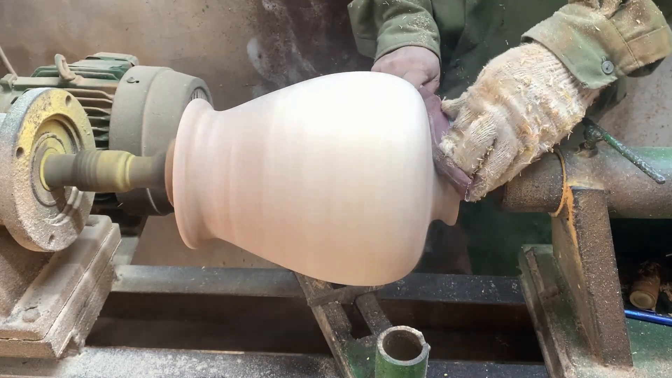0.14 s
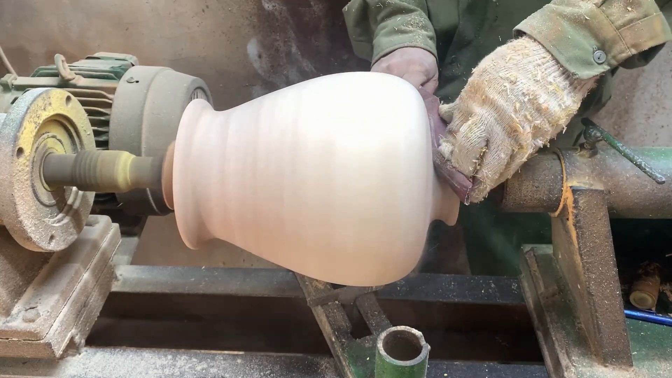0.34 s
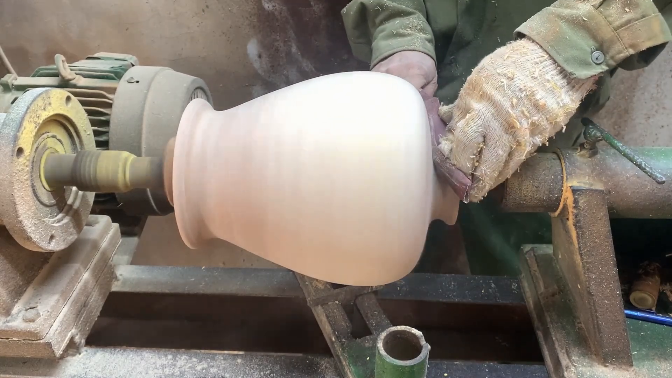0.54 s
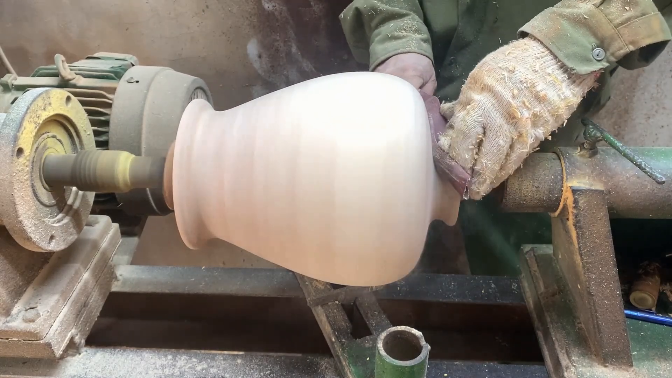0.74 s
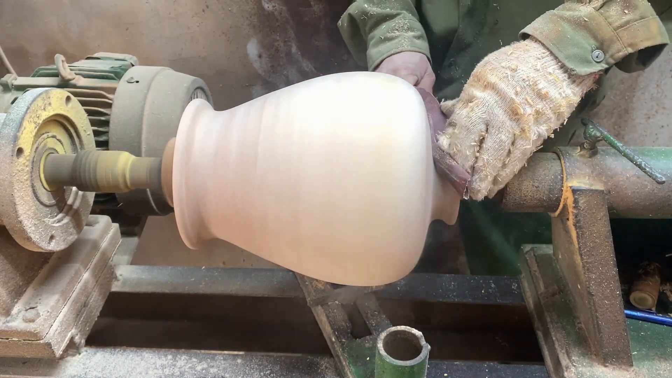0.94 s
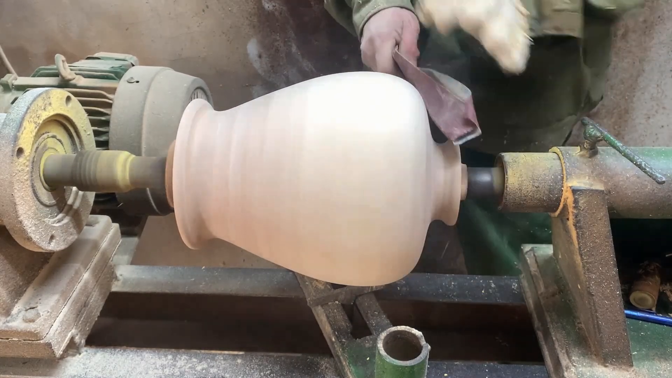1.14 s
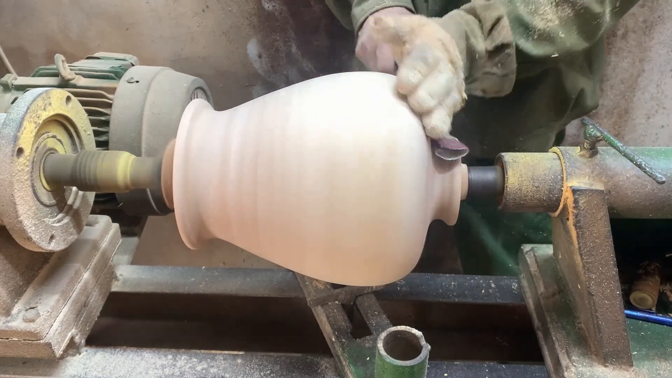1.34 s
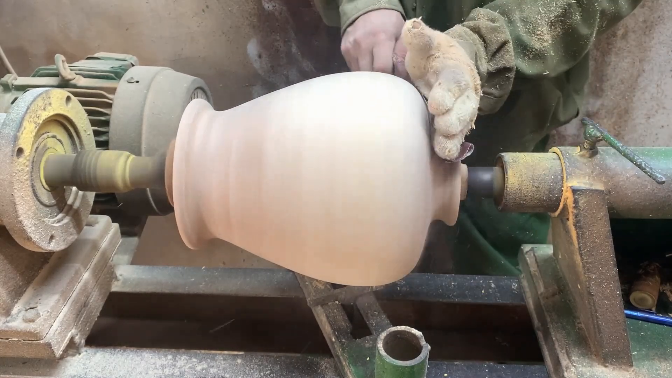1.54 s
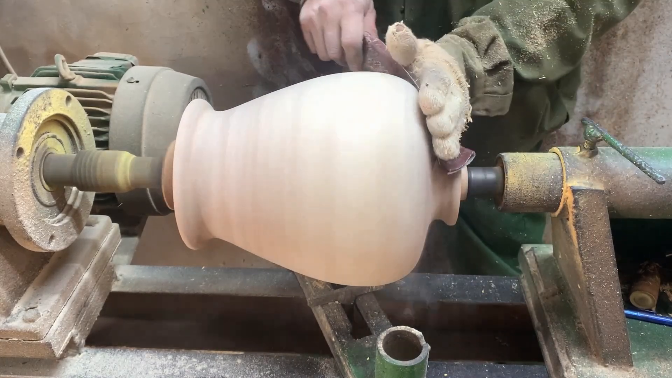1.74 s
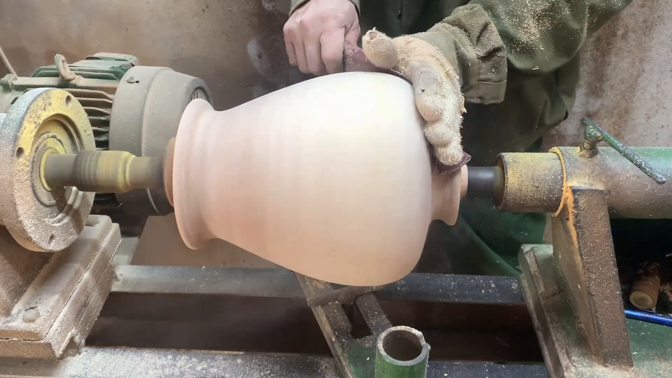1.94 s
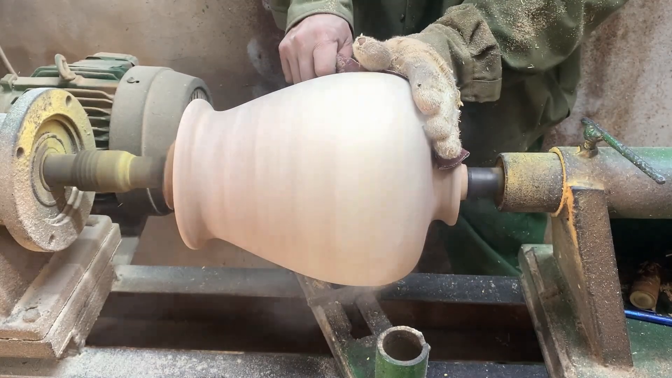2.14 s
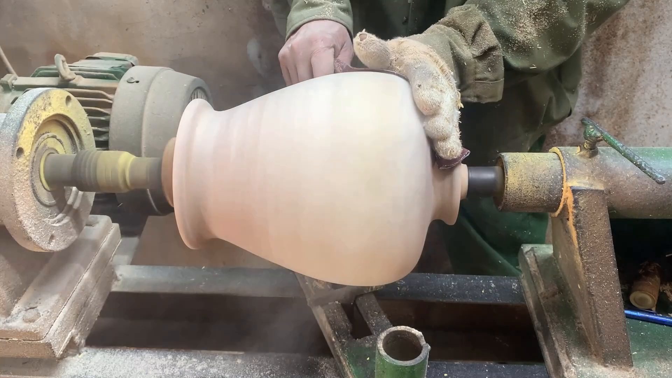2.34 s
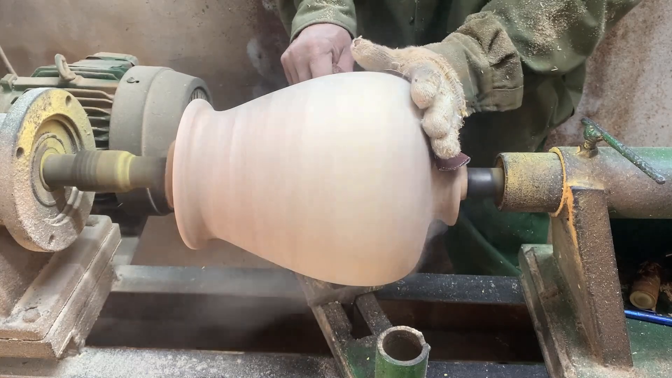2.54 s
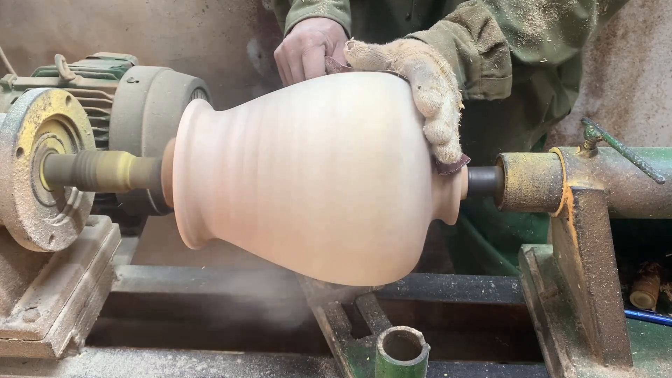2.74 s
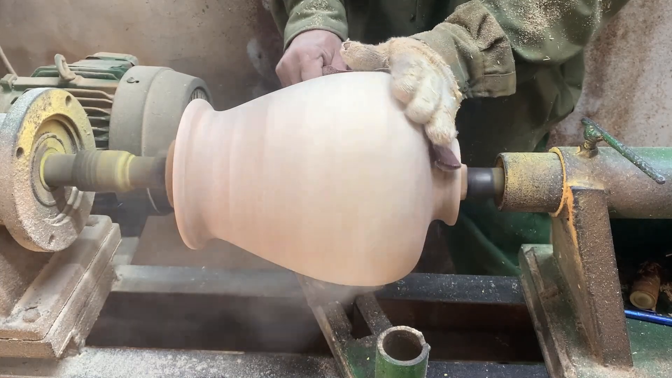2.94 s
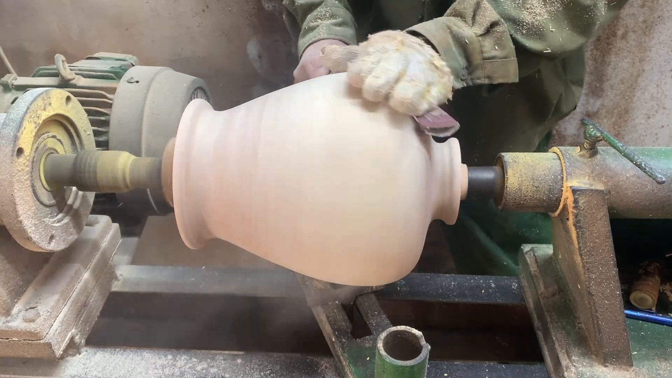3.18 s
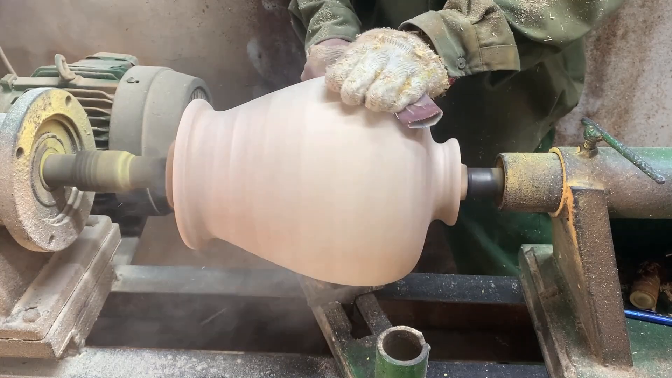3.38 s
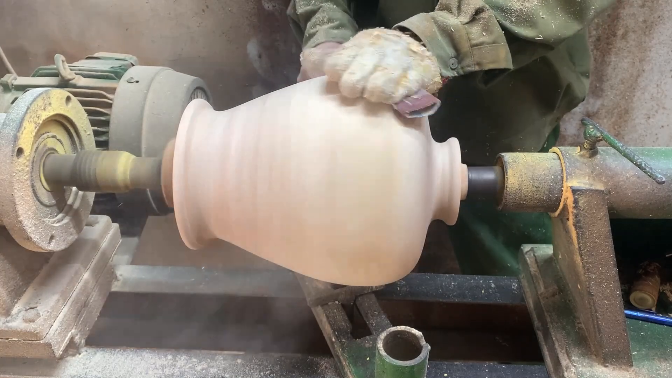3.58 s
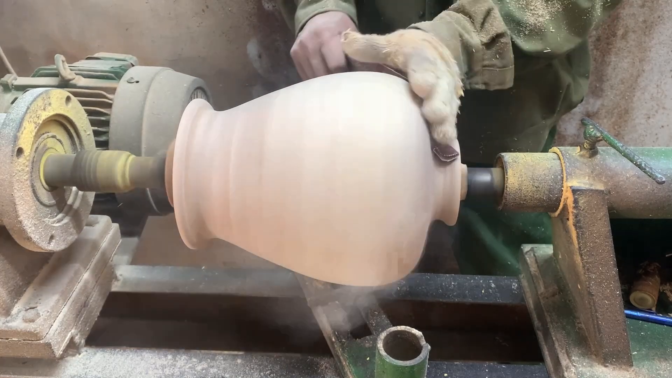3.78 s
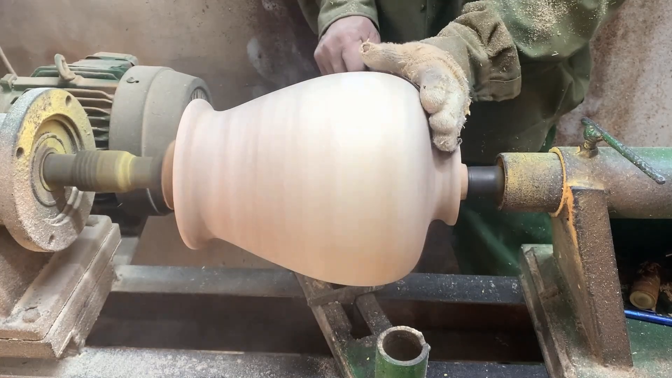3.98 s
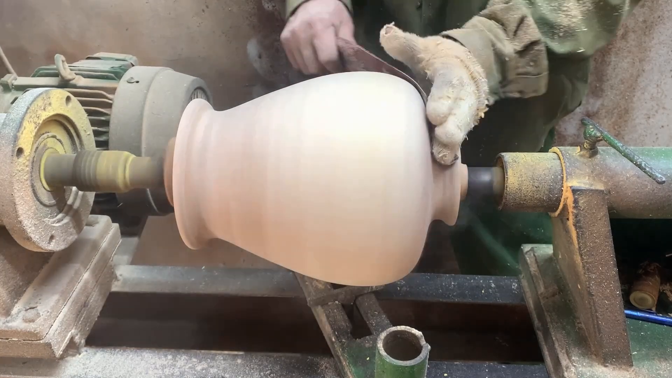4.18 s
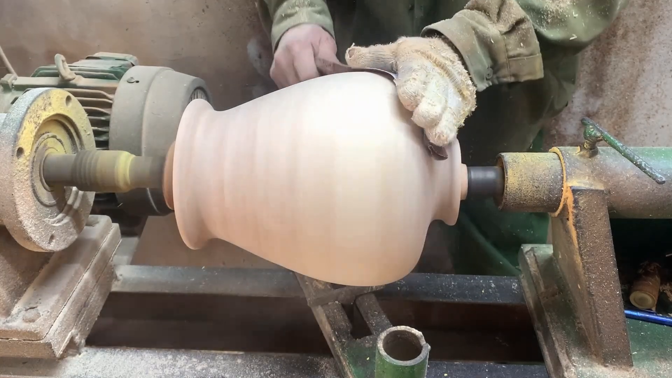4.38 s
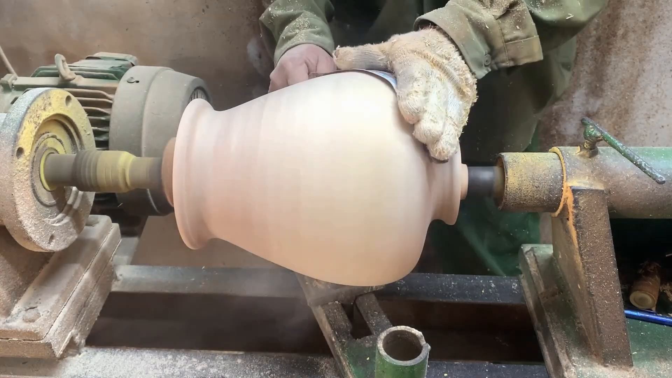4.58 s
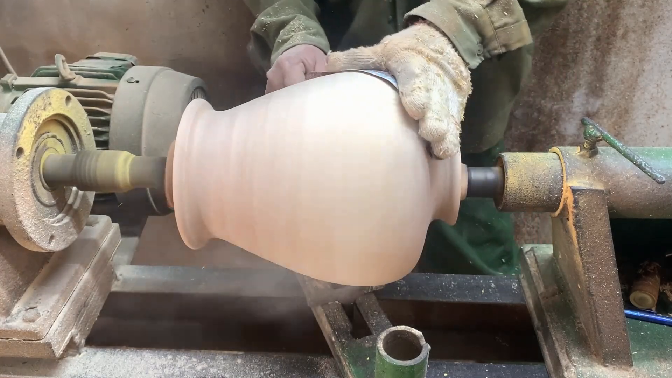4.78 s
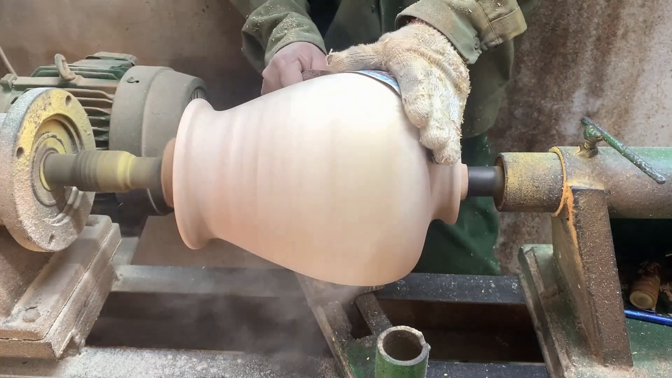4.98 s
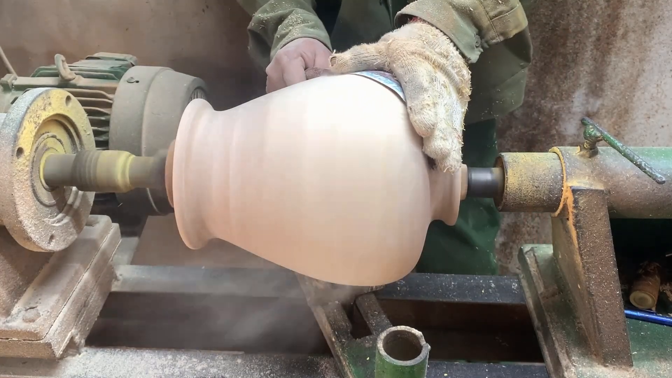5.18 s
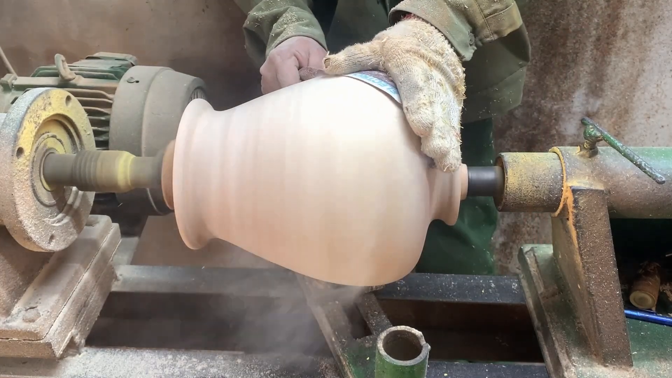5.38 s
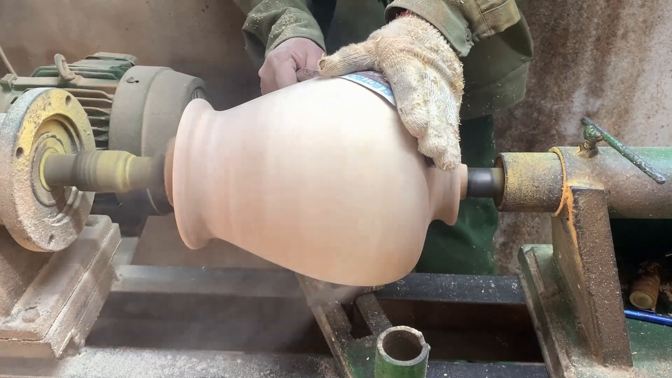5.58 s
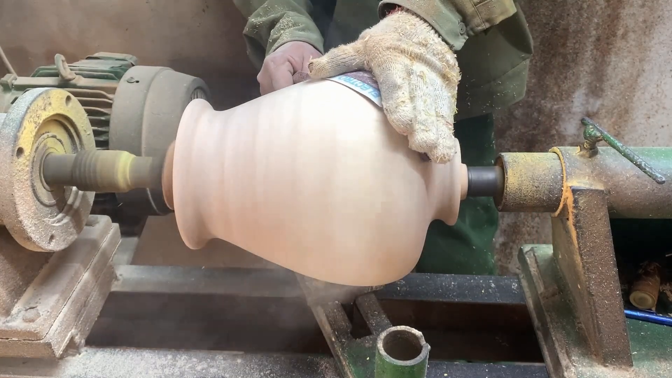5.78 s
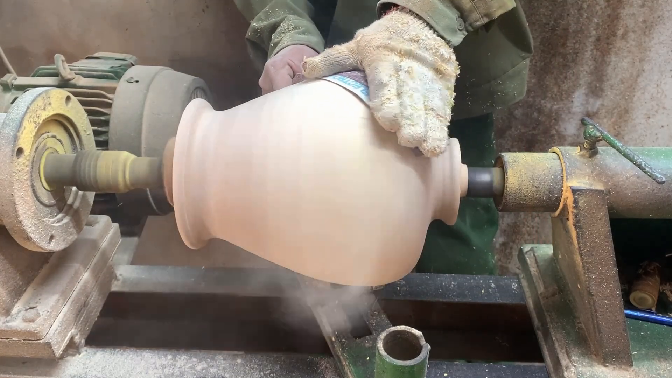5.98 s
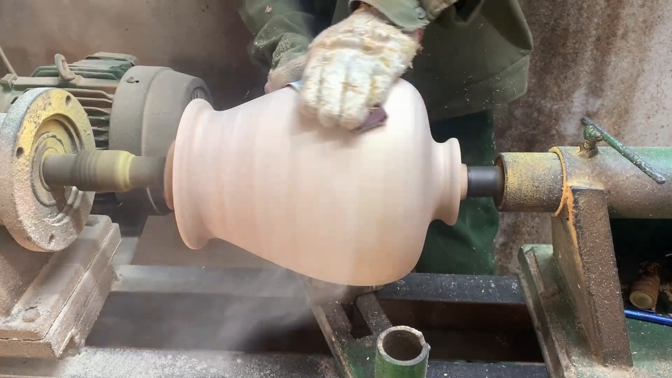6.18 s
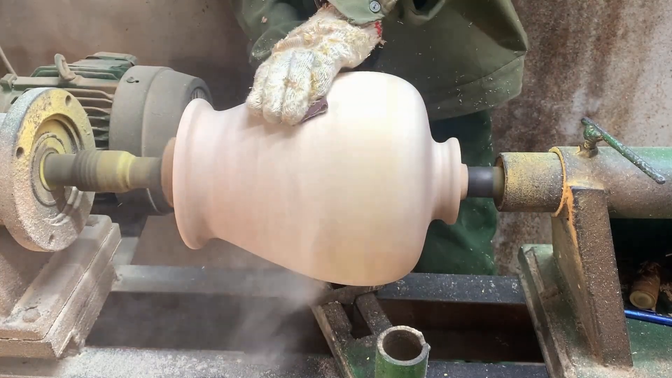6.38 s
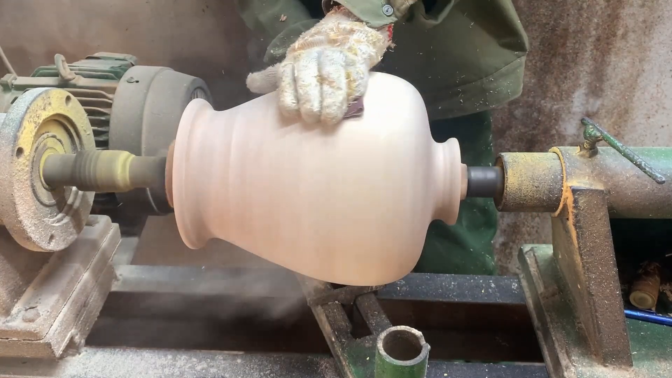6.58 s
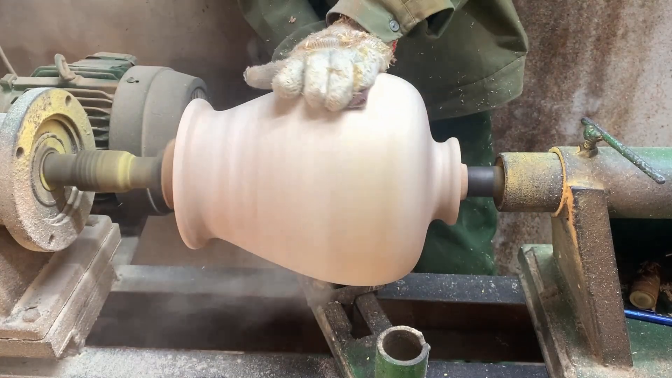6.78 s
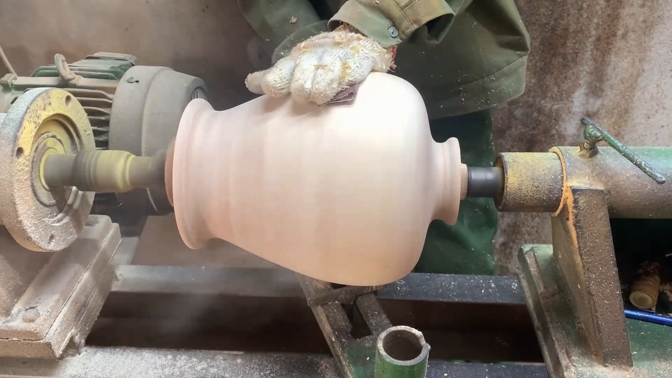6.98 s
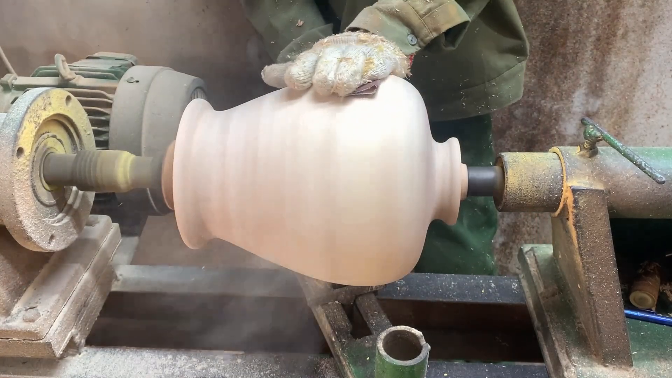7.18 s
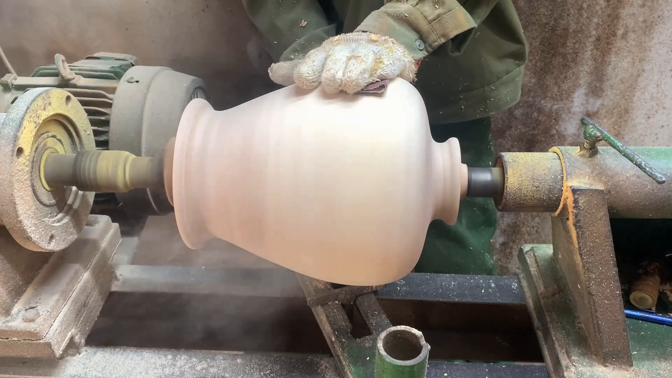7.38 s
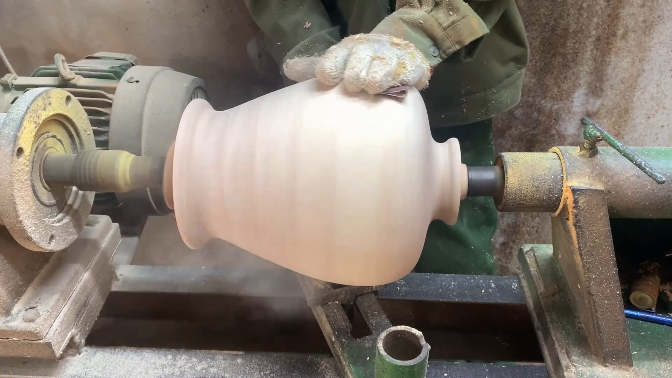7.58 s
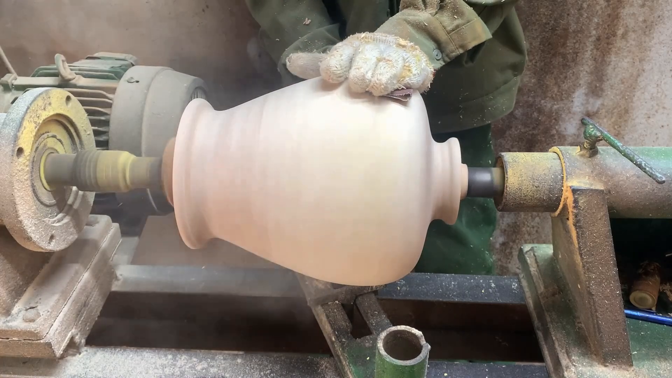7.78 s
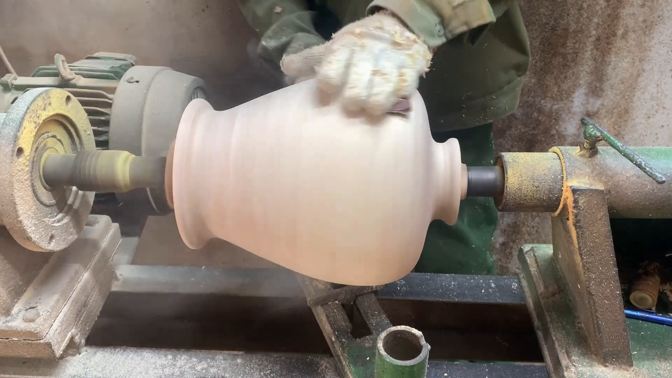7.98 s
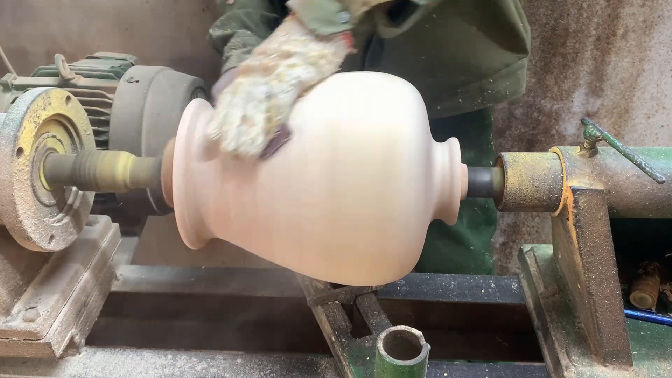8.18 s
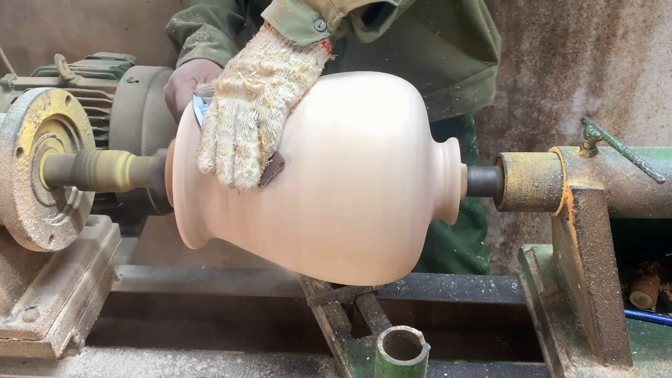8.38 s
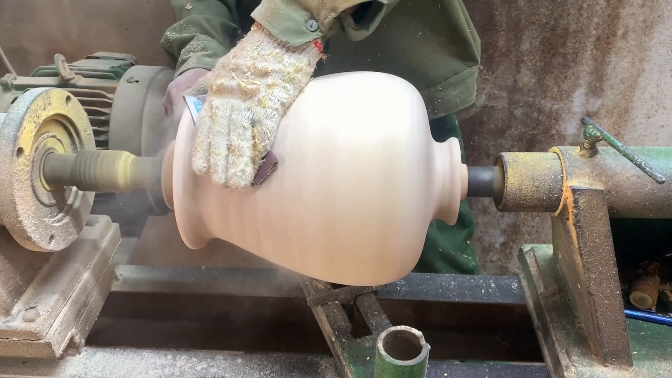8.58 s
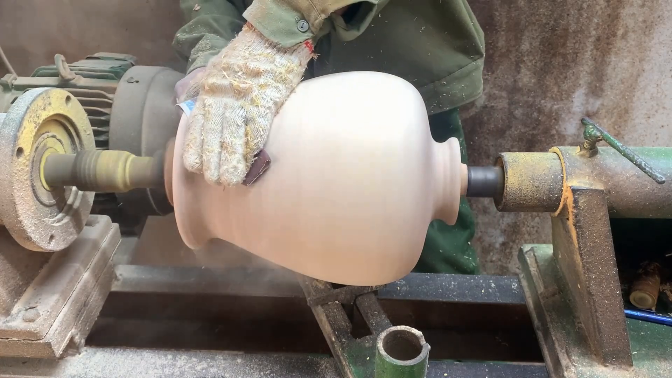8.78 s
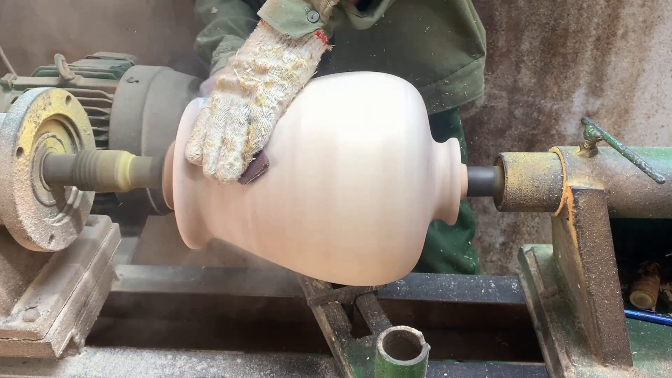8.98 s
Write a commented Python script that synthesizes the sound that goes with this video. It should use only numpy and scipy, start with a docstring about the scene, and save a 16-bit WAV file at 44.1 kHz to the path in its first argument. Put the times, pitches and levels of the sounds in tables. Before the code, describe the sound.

Sandpaper pressed against a wooden vase on a running lathe makes a bright, grainy hiss and rasp. It breaks off for an instant early on, returns louder, then swells and eases, with a few tiny scratches midway. Near the end the rubbing turns raspier, with a thin ringing edge. Underneath, the lathe drones, throbs and hums throughout, heard close up in a workshop.

```python
"""Sanding a vase on a lathe

Sandpaper is pressed by hand on a spinning wooden vase. Countless grains strike the wood and
make a hiss and a rasp that swell with each turn while the paper flutters. The paper starts
wedged in the foot of the vase, lifts off once, and ends in the neck. Underneath, belt and
bearings make the iron parts of the lathe drone and throb, the stand rumbles and the drive hums."""
import sys
import numpy as np
from scipy import signal
from scipy.fft import rfft, irfft, next_fast_len
from scipy.io import wavfile
from scipy.ndimage import uniform_filter1d

SR = 44100
rng = np.random.default_rng(int(sys.argv[2]) if len(sys.argv) > 2 else 0)


def dump(signal):
    """Clip the signal to [-1, 1] and save it as 16-bit WAV at the path in sys.argv[1]."""
    limited = np.clip(np.atleast_2d(signal).T, -1, 1)
    pcm = np.round(limited * 32767).astype(np.int16)
    wavfile.write(sys.argv[1], SR, pcm)


N = 398223

# Levels in the tables are relative. "Side" means left minus right.
# How loud the lathe runs: t/s, level/dB
LATHE_LEVELS = [(0, -39), (1.9, -37.5), (2.15, -35.5), (2.38, -41.5), (4.05, -41.5), (4.65, -43),
                (5.1, -46), (6.5, -47), (7.8, -40.5), (8.15, -44), (9.03, -43.0)]
# Moments when the lathe shudders: t/s, bed surge/dB, headstock surge/dB, stand surge/dB
SHUDDERS = [(.07, 2.5, 4, 2), (.5, 3.5, 0, 10), (1.11, -0.5, 7, 0), (1.3, 2.5, 0, 6), (1.67, 1.5, -2, 8),
            (2.83, -1, 0, 5), (3.22, 2, -8, -1), (3.98, -2.5, 5, 6), (5.08, -2, 0, 8), (7.32, 0.5, -2.5, 5)]
# Tone colour of the stand's rumble and of the whirr of motor and belt: f/Hz, level/dB
RUMBLE_SPECTRUM = [(8, -18), (30, -5), (60, -6.5), (73, -5), (82, -2.5), (97, 3.5), (130, -8.5), (220, -41),
                   (600, -50)]
WHIRR_SPECTRUM = [(60, -11), (140, -4), (220, 1.5), (700, 0.5), (1400, -3), (2400, -7), (4000, -13),
                  (15000, -37)]
# Where the whirr and the paper are heard: f/Hz, side/dB
WHIRR_SIDE = [(200, -2.5), (800, -2.5), (4000, -4)]
PAPER_SIDE = [(1000, -4.5), (2400, -1), (5000, -5), (7700, -2), (8400, 3.5), (10000, 4.5), (15000, 5.5)]
# Ringing of the bed (the base), the headstock (which holds the shaft) and the motor case:
# f/Hz, width/Hz, level/dB, side/dB
BED_MODES = [(253, 89, -12, -5), (403.5, 52, -1, 1), (457.6, 58, 0.5, 0.5), (506, 51, -8, -12),
             (614, 58, -10, -10)]
HEADSTOCK_MODES = [(810.7, 57.4, 0, 0.5)]
MOTOR_MODES = [(1060, 88, 2, 1.8), (1215, 66, 3, 2.8), (1620, 320, -9.5, 0.28)]
# Rhythms of belt, shafts and bearing balls that load each part: f/Hz, depth/dB, first crest t/s
BED_THROBS = [(2.78, 2.1, .022), (35.66, 1.6, .021), (86.85, 1.7, .004)]
HEADSTOCK_THROBS = [(4.85, 2.3, .045), (10.85, 1.4, .016), (17.83, 1.8, .043), (35.7, 1.2, .021)]
MOTOR_THROBS = [(2.62, .9, .22), (37.4, 2.0, .007)]
# Scratches as the hand shifts the sheet: middle t/s, length/s, f/Hz, width/Hz, level/dB
SCRATCHES = [(3.843, .05, 5200, 900, -42), (3.992, .07, 4700, 350, -38), (4.036, .04, 4100, 200, -43),
             (6.09, .09, 4600, 700, -54)]
# How loud the paper rubs on the wood: t/s, hiss level/dB, rasp level/dB
PAPER_LEVELS = [(0, -37.5, -38.5), (0.45, -33.5, -40.0), (1.15, -38.5, -40), (1.42, -35.5, -40),
                (1.46, -31.5, -40.5), (1.7, -36, -40), (1.93, -29.0, -37.0), (2.38, -29.5, -39),
                (2.55, -26.0, -41), (2.8, -31.0, -39.5), (3.55, -33.5, -46.5), (3.83, -31.5, -43),
                (3.96, -37, -43), (4.38, -37.0, -43.5), (4.47, -29.5, -43.5), (4.72, -27, -41),
                (4.82, -29.5, -44), (5.98, -32, -43), (6.15, -33.5, -45.5), (6.55, -37.0, -46.5),
                (6.87, -35.5, -47.5), (7.04, -40.5, -49), (7.35, -34.5, -45.5), (8.1, -35, -47.0),
                (8.35, -33.5, -38.5), (8.85, -32, -40.5), (9.03, -36.5, -41.5)]
# Tone colours of the rubbing, from high to low: f/Hz, level/dB
HISS_SPECTRUM = [(2000, -21.5), (5000, -13), (7000, -5), (8200, -3), (9500, -2), (12000, -1), (13500, -3.5),
                 (15700, -8.5)]
RASP_SPECTRUM = [(1200, -19.5), (2600, -12), (3600, -4.5), (5000, -1.5), (6300, -0.5), (7600, 0),
                 (9500, -5.5), (15000, -37)]
SCRAPE_SPECTRUM = [(300, -17), (1000, -11), (1700, -4.5), (2400, -1), (3200, 0), (4500, -8), (8000, -38)]
# Ringing of the folded sheet and of its edge: f/Hz, width/Hz, level/dB, side/dB
SHEET_MODES = [(2380, 100, 5.5, 0), (3700, 74, -0.5, 7.5), (6000, 490, -0.5, -19)]
EDGE_MODES = [(4200, 880, -9.5, 0), (6200, 1100, -6.5, 0), (8300, 560, -3.5, 0)]

TURN_HZ, HUM_HZ = 17.85, 89.2
LIFT_S, LAND_S = 1.251, 1.344  # the paper leaves the wood and touches it again
TIME = np.arange(N) / SR


def amp(db):
    """Turns decibels into a gain to multiply by."""
    return 10 ** (np.asarray(db) / 20)


def unit(x):
    """Scales a signal to an average strength (rms) of 1."""
    return x / np.sqrt(np.mean(x ** 2) + 1e-20)


def pan(side_db):
    """Left and right gains that set a sound to one side."""
    return amp(np.array([[.5], [-.5]]) * side_db)


def ramp(start_s, length_s):
    """Rises from 0 to 1 in a straight line."""
    return np.clip((TIME - start_s) / length_s, 0, 1)


def db_at(table, hz):
    """Looks up decibels by frequency, gliding between rows on a pitch-like scale."""
    f, db = np.transpose(table)
    return np.interp(np.log(hz + 1), np.log(f + 1), db)


def follow(table):
    """Joins the rows of a time table with straight lines, one curve per column."""
    times, *columns = np.transpose(table)
    return [np.interp(TIME, times, column) for column in columns]


def shaped(x, gain):
    """Filters x by a gain that depends on frequency."""
    size = next_fast_len(N + 4096, True)
    return irfft(rfft(x, size) * gain(np.fft.rfftfreq(size, 1 / SR)), size)[..., :N]


def noise(gain):
    """Stereo noise of strength 1, coloured by a gain that depends on frequency."""
    return unit(shaped(rng.standard_normal((2, N)), gain))


def wander(hz, width_hz):
    """A random wobble of strength 1, with rates around hz."""
    step = 20
    at = np.arange(0, N, step)
    band = np.exp(-.5 * ((np.fft.rfftfreq(len(at), step / SR) - hz) / width_hz) ** 2)
    wobble = irfft(rfft(rng.standard_normal(len(at))) * band, len(at))
    return unit(np.interp(np.arange(N), at, wobble))


def cycle(hz, drift_rad):
    """A smooth wave that slowly drifts ahead of and behind its beat."""
    return np.cos(2 * np.pi * (hz * TIME + rng.random()) + drift_rad * wander(0, 1))


def resonances(modes, f):
    """Left and right gains of a ringing body: its peaks add in power."""
    peaks = [amp(db) * pan(side_db) / (1 + ((f - hz) / (0.8 * width)) ** 2)
             for hz, width, db, side_db in modes]
    return np.sqrt(np.sum(np.square(peaks), axis=0))


def grit(snaps_per_s, spread_db, snap_gain):
    """Countless tiny impacts merge into noise; single coarse grains snap out of it."""
    size = amp(spread_db * np.minimum(rng.exponential(1, (2, N)), 4))
    snaps = size * rng.choice([-1, 1], (2, N)) * (rng.random((2, N)) < snaps_per_s / SR)
    return unit(rng.standard_normal((2, N)) + snap_gain * unit(snaps))


def tilted(x, db_per_octave, pivot_hz):
    """Makes a sound brighter or duller over time by tipping its spectrum like a seesaw."""
    hz, t, spectra = signal.stft(x, SR, nperseg=512)
    octaves = np.clip(np.log2((hz + 1) / pivot_hz), -1, 1)[:, None]
    slope = np.interp(t, TIME, db_per_octave)
    return signal.istft(spectra * amp(octaves * slope), SR, nperseg=512)[1][:, :N]


def shudders(spread_s=.07):
    """Brief bell-shaped surges of bed, headstock and stand, in dB."""
    times, *surges_db = np.transpose(SHUDDERS)
    distance = (TIME - times[:, None]) / spread_s
    return np.array(surges_db) @ np.exp(-np.minimum(distance ** 2, 20))


def stand(level_db, surge_db):
    """The stand rumbles in lumps as hard as the lathe runs, with the wavering hum of the drive."""
    rumble = noise(lambda f: amp(db_at(RUMBLE_SPECTRUM, f)))
    hum = cycle(HUM_HZ, drift_rad=0.73) * amp(2.2 * wander(0, 2.9))
    lumps_db = 2.0 * wander(0, 9)
    shake_db = level_db + 0.18 * (level_db.mean() - level_db)
    return amp(shake_db + surge_db + lumps_db) * pan(-4.5) * (amp(-18) * rumble + amp(-26) * hum)


def drone(modes, throbs, uneven_db):
    """Rolling bearings make one part of the lathe ring, throbbing with the load on it."""
    load_db = sum(db * np.cos(2 * np.pi * hz * (TIME - crest)) for hz, db, crest in throbs)
    rolling = grit(snaps_per_s=300, spread_db=4.0, snap_gain=0.34)
    rolling *= amp(load_db + uneven_db * wander(0, 24))
    return unit(shaped(rolling, lambda f: resonances(modes, f)))


def lathe(level_db, bed_db, headstock_db):
    """Bed, headstock and motor case each drone in their own rhythm over the belt's steadier whirr."""
    bed = amp(-0.7 + bed_db) * drone(BED_MODES, BED_THROBS, uneven_db=2.23)
    headstock = amp(-2 + headstock_db) * drone(HEADSTOCK_MODES, HEADSTOCK_THROBS, uneven_db=1.5)
    motor = amp(-3.5) * drone(MOTOR_MODES, MOTOR_THROBS, uneven_db=2.5)
    whirr = amp(-2) * noise(lambda f: amp(db_at(WHIRR_SPECTRUM, f)) * pan(db_at(WHIRR_SIDE, f)))
    whirr_db = level_db + 0.67 * (level_db.mean() - level_db)
    return amp(level_db) * (bed + headstock + motor) + amp(whirr_db) * whirr


def scratches():
    """An edge of the sheet catches for a moment and rings around one pitch."""
    out = np.zeros((2, N))
    for middle_s, length_s, hz, width_hz, db in SCRATCHES:
        count = round(length_s * SR)
        start = round((middle_s - length_s / 2) * SR)
        peak = signal.iirpeak(hz, hz / width_hz, fs=SR)
        edge = signal.lfilter(*peak, rng.standard_normal((2, count)))
        out[:, start:start + count] += amp(db) * unit(edge) * np.hanning(count)
    return out


def pressure():
    """Pressure swings with each turn, the fluttering sheet and the hand; gives a gain."""
    turn_db = 0.4 * cycle(TURN_HZ, drift_rad=0.84)
    flutter_db = 0.52 * wander(64, width_hz=8)
    tremor_db = 0.37 * wander(0, width_hz=26)
    sway_db = 0.38 * wander(7, width_hz=3)
    chatter_db = 0.38 * wander(0, width_hz=160)
    return amp(turn_db + flutter_db + tremor_db + sway_db + chatter_db)


def patchy_flicker(x, flicker_db):
    """The tone colour flickers at random in small patches of pitch and time."""
    spectra = signal.stft(x, SR, nperseg=1024)[2]
    patches = rng.standard_normal(spectra.shape[1:])
    patches = uniform_filter1d(patches, size=4, axis=0)  # blur across frequency
    patches = unit(uniform_filter1d(patches, size=5, axis=1))  # blur across time
    return signal.istft(spectra * amp(flicker_db * patches), SR, nperseg=1024)[1][:, :N]


def lifted(fade_s):
    """1 while the paper is held clear of the wood, 0 while it touches."""
    return ramp(LIFT_S - fade_s, fade_s) - ramp(LAND_S, fade_s)


def rub(spectrum):
    """Grains striking the wood make noise in one tone colour, spread left and right."""
    grains = grit(snaps_per_s=5000, spread_db=2.5, snap_gain=0.56)
    return unit(shaped(grains, lambda f: amp(db_at(spectrum, f)) * pan(db_at(PAPER_SIDE, f))))


def sheet_scrape(wedged, pinched):
    """The folded sheet scrapes low and rings, louder when wedged in or pinched tight."""
    ring = noise(lambda f: resonances(SHEET_MODES, f))
    return amp(3.5 * wedged + 3 * pinched) * (amp(-4) * rub(SCRAPE_SPECTRUM) + amp(-11) * ring)


def edge_song(wedged, in_neck):
    """The edge of the sheet sings, louder early on while the sheet is wedged and most of all in the neck."""
    return amp(-5 + 2.5 * wedged + 9.5 * in_neck) * noise(lambda f: resonances(EDGE_MODES, f))


def sanding():
    """The paper hisses and rasps on the wood; the grip and the place on the vase colour it."""
    hiss_db, rasp_db = follow(PAPER_LEVELS)
    hiss_fade_s, rasp_fade_s = 0.022, 0.094
    wedged = 1 - ramp(start_s=1.76, length_s=0.6)  # wedged in tight early on, easing off from 1.76 s
    pinched = 1 - ramp(LIFT_S, hiss_fade_s)  # held tight until the lift
    in_neck = ramp(start_s=8.18, length_s=0.35)
    swell = pressure()
    # The hiss is brighter while pinched, duller in the neck and as the rasp grows.
    db_per_octave = 1.5 + 5 * pinched - 2.5 * in_neck - 0.24 * (rasp_db - rasp_db.mean())
    hiss = tilted(rub(HISS_SPECTRUM), db_per_octave, pivot_hz=9900)
    hiss *= amp(hiss_db + 2.5 - 10 * lifted(hiss_fade_s))
    sheet = amp(7) * rub(RASP_SPECTRUM) + sheet_scrape(wedged, pinched) + edge_song(wedged, in_neck)
    sheet *= amp(rasp_db - 15 * lifted(rasp_fade_s))
    return swell * patchy_flicker(hiss + sheet, flicker_db=2.0)


def scene():
    """The running machine with the sandpaper on top."""
    level_db, = follow(LATHE_LEVELS)
    bed_db, headstock_db, stand_db = shudders()
    paper = sanding() + scratches()
    machine = lathe(level_db, bed_db, headstock_db) + stand(level_db, stand_db)
    return machine + paper


def record(dry):
    """Boosts the treble on the right, then cuts the very highest sounds on both sides."""
    treble_hz, boost_db, top_hz = 7980, 5.7, 15800
    right = shaped(dry[1], lambda f: amp(boost_db * (f > treble_hz)))
    lowpass = signal.firwin(601, top_hz, window=("kaiser", 8), fs=SR)
    return signal.oaconvolve(np.array([dry[0], right]), lowpass[None], "same")


dry = scene()
out = record(dry)
dump(out)
```